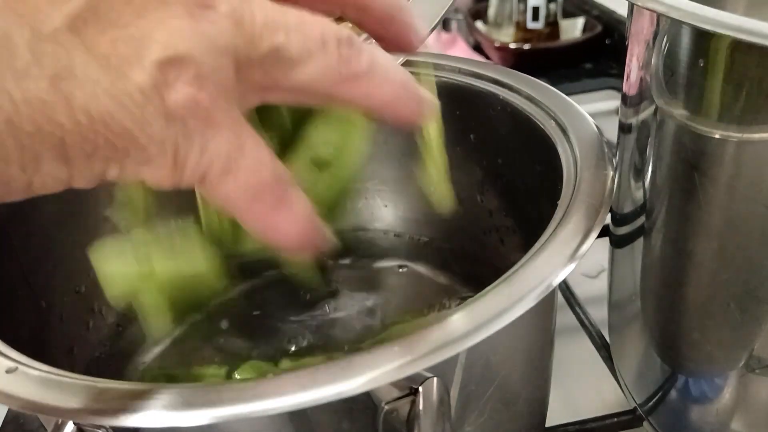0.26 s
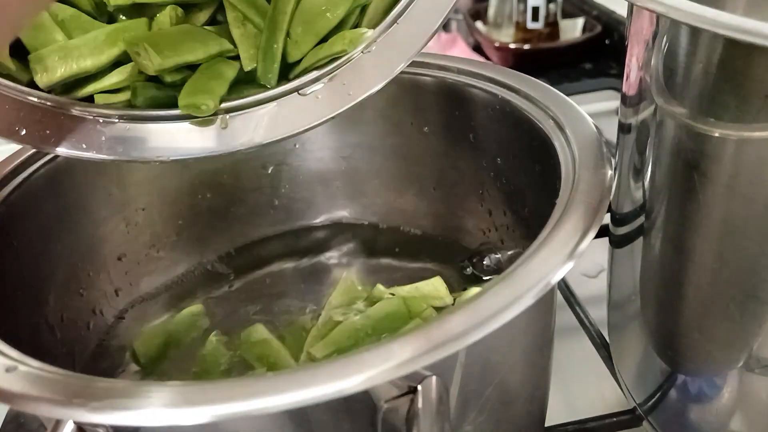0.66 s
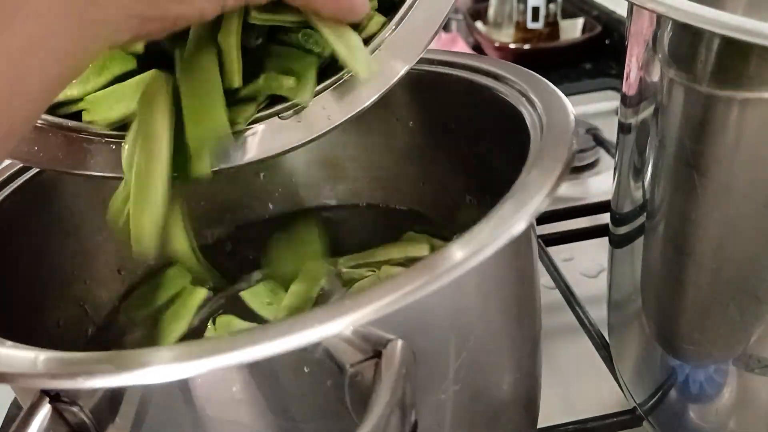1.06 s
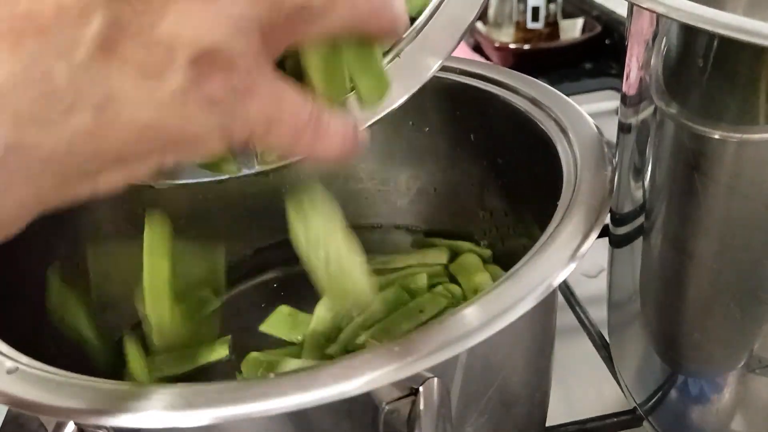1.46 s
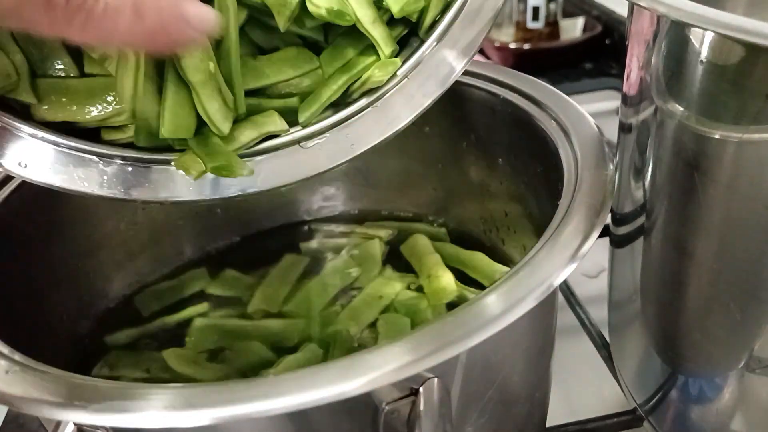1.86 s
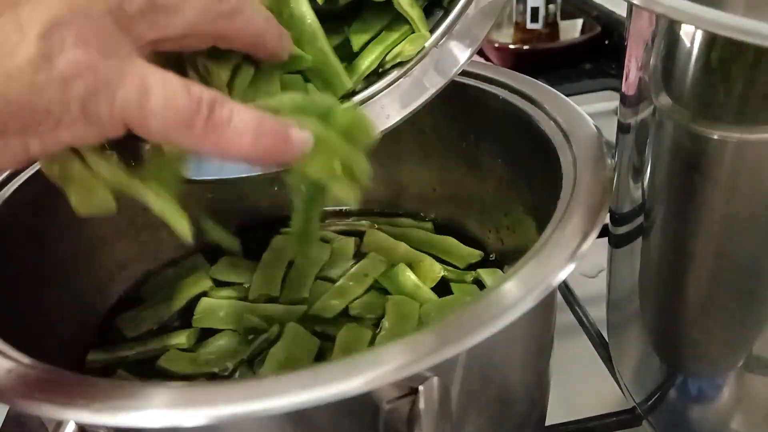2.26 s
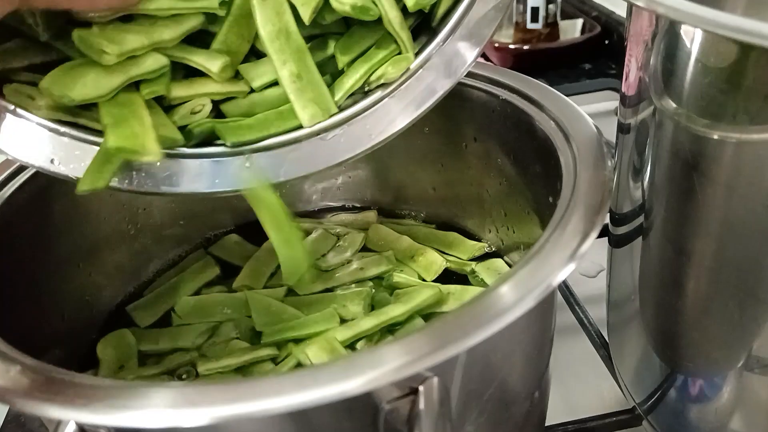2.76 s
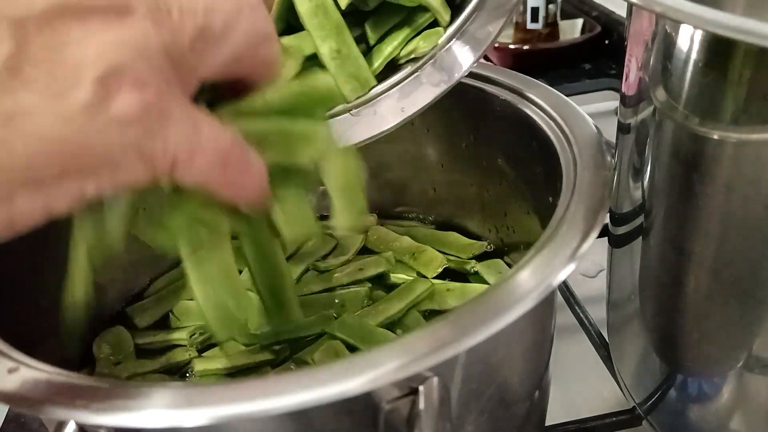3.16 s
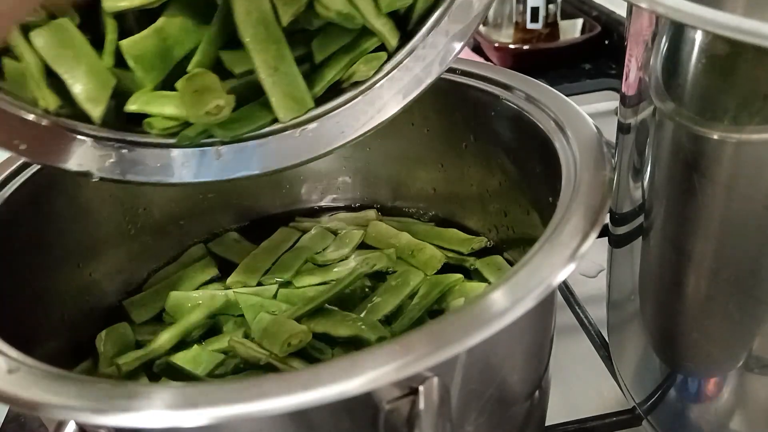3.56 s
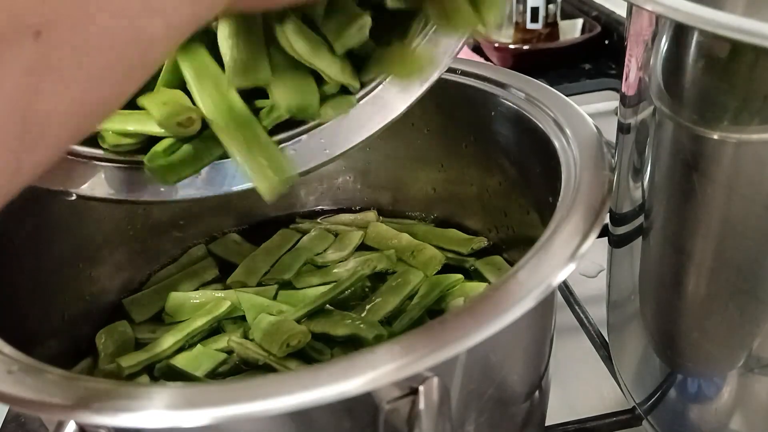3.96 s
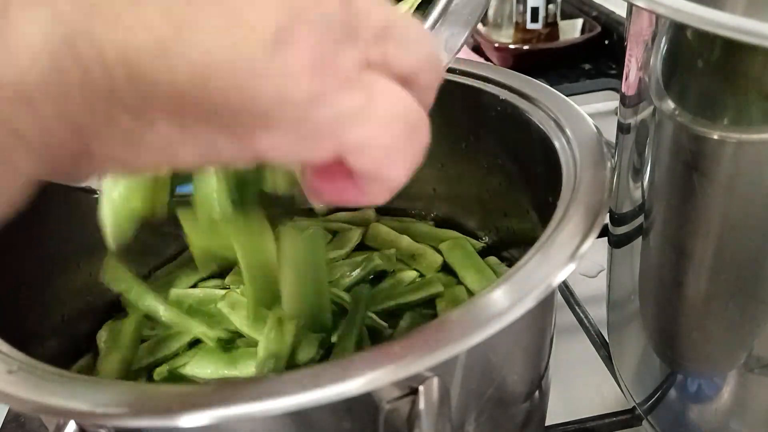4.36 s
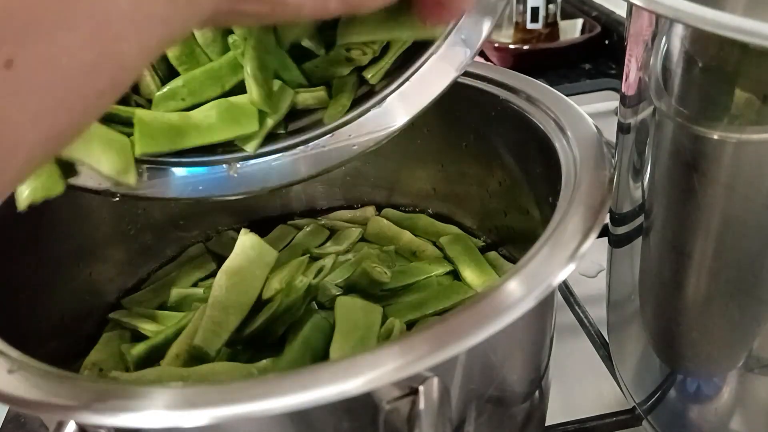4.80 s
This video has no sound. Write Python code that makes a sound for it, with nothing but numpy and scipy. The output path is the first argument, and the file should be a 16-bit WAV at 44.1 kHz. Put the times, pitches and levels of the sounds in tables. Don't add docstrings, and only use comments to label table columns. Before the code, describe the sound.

Close, wet pattering of beans raked from a metal bowl into a resonant pot, splashy first, then duller on the heap, over soft stove rumble.

```python
import sys
import numpy as np
from scipy import signal
from scipy.fft import rfft, irfft, next_fast_len
from scipy.io import wavfile

SR = 44100
rng = np.random.default_rng(int(sys.argv[2]) if len(sys.argv) > 2 else 0)


def master(y):
    cut = np.clip(np.atleast_2d(y).T, -1, 1)
    pcm = np.round(cut * 32767)
    wavfile.write(sys.argv[1], SR, pcm.astype(np.int16))


def boost(x):
    u = np.asarray(x, float) / 20
    return 10 ** u


N = 221990
SECONDS = np.arange(N) / SR

# (frequency [Hz], level [dB], t60 [s], left over right [dB])
HOLLOW = [(399.3, -7.5, 0.029, -7.5), (475.6, -3, 0.045, -8.5), (526.3, -3, 0.05, 15.5)]
# (frequency [Hz], level [dB], t60 [s], left over right [dB])
UPPER_HOLLOW = [(596.5, 4, 0.12, 0.74), (610, 0, 0.056, 0.8), (691, -9, 0.17, 0.35)]
# (frequency [Hz], level [dB], t60 [s], left over right [dB])
CROSS = [(807.3, 2, 0.048, -0.33), (969, 0.5, 0.066, 0.043), (1160, 1.5, 0.012, -0.68),
         (1179, 2.5, 0.053, -0.55), (1247, 1, 0.062, -0.19)]
# (frequency [Hz], level [dB], t60 [s], left over right [dB])
SLAP = [(1591, -6.5, 0.069, -10.5), (1925, -2, 0.013, 9), (1966, -4.5, 0.023, 4), (2200, 5.5, 0.018, 1),
        (2424, 2.5, 0.036, -1), (2640, -19.5, 0.026, 5), (2710, -4.5, 0.021, -2.5),
        (2940, -3.5, 0.028, -2.5), (3043, -5.5, 0.028, 0), (3370, -24, 0.0284, 4)]
# (frequency [Hz], level [dB], t60 [s], left over right [dB])
WALL = [(133.8, -9.5, 0.069, 5.5), (161.3, -28, 0.32, -10), (193.3, -1, 0.087, -1), (237.2, 2.5, 0.2, 2),
        (299.7, -3.5, 0.24, 1), (362, -20, 0.15, -5.5)]
# (frequency [Hz], level [dB], t60 [s], left over right [dB])
STEEL = [(460, -13, 0.0948, 1.5), (534, 3, 0.15, 2), (610, -22.5, 0.099, 1.53), (975, -6, 0.33, -0.99),
         (1270, -10.5, 0.15, -1)]
# (frequency [Hz], level [dB], t60 [s], left over right [dB])
BOWL_MODES = [(1240, -12, .25, 0), (1505, -9, .09, 1), (1860, -24, .1, 1), (2051, 0, .2, 2),
              (3714, -20, .05, 2)]

# (time [s], hollow [dB], cross re hollow [dB], slap re hollow [dB])
IN_WATER = [(0.174, -33.5, 0.5, -3), (0.232, -30, -4, 3.5), (0.261, -35, -9, -12),
            (0.296, -26.5, -10.5, -7.5), (0.363, -25, -14, -8), (0.391, -29, -4, -5), (0.433, -37, -3, 1),
            (0.471, -24.5, -3, 3), (0.496, -28, -0.5, 4.5), (0.515, -29, -23, 2), (0.544, -24.5, -8, -1.5),
            (0.681, -26.5, -30.5, -25), (0.825, -60.5, -29, 22.5), (1.031, -43.5, -2, -25),
            (1.226, -29.5, -3, -6.5), (1.263, -44.5, 14.5, -4), (1.301, -32.5, -12.5, -1),
            (1.326, -38.5, 5.5, -2), (1.349, -18.5, -17, -5), (1.387, -3.5, -3, -8.5),
            (1.429, -12, -21, -14), (1.504, -28.5, -17, -0.5), (1.55, -51, -18, 8),
            (1.641, -28.5, -2.5, -14), (1.655, -34, -5, -1.5), (1.778, -23.5, -17, -28),
            (1.814, -23, -2.5, -4), (1.849, -25, 0, -6), (1.885, -23, -22, -8), (1.905, -36.5, 4.5, -8),
            (1.936, -25.5, -31, -33)]
# (time [s], hollow [dB], cross re hollow [dB], slap re hollow [dB])
ON_HEAP = [(2.03, -20.5, -12.5, -26.5), (2.047, -39, -19, -45), (2.092, -15, -16.5, -36.5),
           (2.25, -28.5, -4.5, -6.5), (2.283, -20.5, -36, -25), (2.391, -43.5, 3, 7),
           (2.479, -26, -8.5, -7), (2.499, -28, 0.5, -25), (2.574, -23, -9.5, -13), (2.6, -17, -11.5, -15),
           (2.637, -17.5, -7.5, -9.5), (2.675, -24, -10, -10), (2.77, -25, -16.5, -16.5),
           (2.933, -40, -2.5, -5.5), (3.022, -30.5, -12, -12), (3.119, -7, -19, -19.5),
           (3.233, -13.5, -23, -49), (3.354, -23.5, -22, -16.5), (3.43, -32, -1, -5.5),
           (3.484, -38.5, 2, 3.5), (3.515, -39, -26, -14), (3.556, -35, -2.5, -7),
           (4.268, -23.5, -11, -4.5), (4.306, -19.5, -23, -10), (4.338, -18, -13, -14.5),
           (4.456, -27, -6.5, -14), (4.564, -27.5, -2, -19), (4.599, -25, -7, -3), (4.658, -27, -4, -6.5),
           (5.022, -22.5, -9, -10.5)]
# (time [s], hollow [dB], cross re hollow [dB], slap re hollow [dB])
STRAYS = [(0.03, -31, -22.5, -14), (2.338, -32, -29, -13.5), (2.52, -38, -17, -20),
          (2.709, -30.5, -27.5, -18), (3.395, -37, -19, -29), (0.161, -36, -28.5, -24.5),
          (0.585, -41, -4.5, -16), (1.152, -36.5, -25, -25.5), (4.418, -43.5, -3, 4), (4.515, -57, -8, 10),
          (4.70, -38.5, -25.5, -15)]
# (first bean [s], length [s], level [dB], brightness [dB])
HANDFULS = [(0.208, 0.06, -51, -5), (0.397, 0.15, -47, 3.5), (0.449, 0.1, -55, 8.5),
            (1.116, 0.35, -54, -25), (1.348, 0.16, -40.5, 6), (1.59, 0.29, -49, -8),
            (2.03, 0.17, -49.5, -13), (2.365, 0.39, -49.5, 0), (3.087, 0.033, -54.5, 0),
            (3.38, 0.16, -42.5, -5.5), (4.283, 0.11, -50.5, 2.5), (4.556, 0.14, -42, -1.5),
            (4.969, 0.32, -57.5, 0)]
# (time [s], level [dB], t60 [s])
WALL_HITS = [
    (1.39, -42, 0.26),
    (2.55, -60, 1.9),
    (3.121, -43, 0.7),
    (3.499, -52, 2.3),
    (4.105, -46.5, 0.086),
    (4.329, -44.5, 0.53),
    (4.55, -72, 1),
]

# (peak time [s], level [dB], frequency [Hz])
LOW_KNOCKS = [(0.373, -27.5, 520), (0.391, -27, 497), (0.506, -28.5, 555), (0.517, -30, 514),
              (0.548, -30, 537), (0.685, -35, 501), (1.354, -42, 640), (1.394, -7.5, 544),
              (1.404, -5.5, 553.3), (1.416, -17, 567), (1.438, -32, 525), (1.456, -38, 517),
              (1.482, -26.5, 597), (1.653, -29, 520), (1.821, -23.5, 542), (1.855, -29, 602),
              (1.887, -28, 578), (2.051, -27, 613), (2.076, -28, 612), (2.096, -20, 594), (2.111, -28, 615),
              (2.286, -29.5, 535), (2.303, -37.5, 516), (2.483, -29.5, 536), (2.523, -28.5, 601),
              (2.605, -26.5, 595), (2.713, -28, 583), (2.732, -32, 568), (2.776, -28.5, 579),
              (3.132, -20, 547), (3.169, -30, 643), (3.235, -28, 528), (3.244, -27, 581), (3.398, -29, 600),
              (3.519, -28, 538), (4.275, -26, 570), (4.289, -31, 613), (4.307, -39, 536), (4.342, -33, 566),
              (4.664, -26, 534), (4.71, -28, 670), (5.029, -35.5, 509)]
# (peak time [s], level [dB], frequency [Hz])
MID_KNOCKS = [(0.183, -45, 1140), (0.436, -33, 1120), (0.475, -29, 1150), (0.506, -27.5, 1158),
              (0.53, -31, 806), (0.546, -33.5, 1190), (0.546, -32.5, 814), (1.264, -28, 1164),
              (1.329, -27, 1157), (1.34, -25.5, 1166), (1.392, -17, 970), (1.42, -29, 1244),
              (1.445, -43, 1210), (1.466, -39, 990), (1.658, -27, 1183), (1.818, -23.5, 1193),
              (1.858, -24, 1154), (1.911, -34, 1220), (1.939, -35, 1157), (2.053, -34, 983),
              (2.099, -42, 1200), (2.253, -35, 1258), (2.487, -33, 776), (2.501, -23, 1190),
              (2.515, -36, 1215), (2.646, -41, 1130), (2.657, -30, 1232), (2.678, -25.5, 1200),
              (2.934, -41.5, 1195), (3.12, -31, 1070), (3.156, -41, 1200), (3.235, -38.5, 1230),
              (3.487, -27.5, 1184), (3.517, -33, 804), (4.271, -35.5, 826), (4.34, -31, 960),
              (4.349, -33, 1060), (4.46, -37, 1203), (4.567, -27, 1272), (4.585, -23, 1232),
              (4.6, -25.5, 1222), (4.657, -35, 1174), (4.691, -35.5, 1076), (5.029, -27.5, 1023)]
# (peak time [s], level [dB], frequency [Hz])
HIGH_KNOCKS = [(0.208, -37.5, 2940), (0.262, -40.5, 2690), (0.498, -42, 2820), (0.5, -45, 2200),
               (0.516, -44, 2850), (0.547, -37, 2120), (0.548, -36, 2950), (1.253, -38, 2250),
               (1.355, -26.5, 1720), (1.362, -17.5, 3220), (1.375, -22, 3430), (1.39, -22, 2980),
               (1.394, -25, 2370), (1.403, -22.5, 2890), (1.419, -43, 2350), (1.432, -26, 2960),
               (1.513, -35, 2940), (1.553, -32.5, 1830), (1.656, -36, 1690), (1.656, -44, 2260),
               (1.818, -37, 1790), (1.819, -37, 2450), (1.833, -44, 2220), (1.843, -37, 2100),
               (1.88, -40, 1770), (1.903, -35, 2350), (2.09, -40, 2410), (2.398, -32.5, 2080),
               (2.409, -36, 1533), (2.52, -34.5, 2200), (2.674, -40, 2300), (2.674, -40, 1910),
               (2.775, -44, 2300), (3.122, -40, 2965), (3.489, -33, 1903), (4.27, -29.5, 1850),
               (4.307, -37, 2510), (4.334, -33.5, 2380), (4.349, -34.5, 2260), (4.359, -39, 2360),
               (4.524, -37.5, 2320), (4.604, -47, 2960), (4.606, -35, 2230), (4.638, -37, 2300)]
# (peak time [s], level [dB],
# frequency [Hz])
FURTHER_KNOCKS = [(.31, -38, 2870), (.365, -30.5, 523), (.39, -39.5, 1830), (.412, -38, 506),
                  (.42, -36, 1816), (.452, -33.5, 2000), (.457, -34, 546), (.484, -33, 2880), (.57, -37, 703),
                  (2.615, -37, 2320), (2.625, -25, 615), (2.695, -27, 610), (2.705, -38.5, 2244),
                  (3.348, -40.5, 1180), (3.365, -38, 613), (3.38, -30, 614), (3.395, -42, 1180),
                  (3.412, -30.5, 627), (3.433, -37, 645), (3.455, -31, 627), (3.547, -46, 2130),
                  (3.915, -38, 2120), (4.412, -39.5, 1128), (4.425, -37.5, 2950), (4.43, -36, 2280),
                  (4.432, -44, 1240), (4.552, -35.5, 505)]

# (time [s], peak [dB], centre frequency [Hz], t60 [s])
SPLASHES = [(0.211, -9.5, 7650, 0.021), (0.3485, -14.5, 7840, 0.039), (0.432, -15.5, 7240, 0.06),
            (0.4533, -4.5, 8370, 0.098), (0.502, -9, 6700, 0.044), (0.543, -13.5, 7400, 0.019),
            (0.5814, -17, 7100, 0.049), (0.832, -14.5, 6960, 0.11), (0.95, -19.5, 7280, 0.16),
            (0.973, -26, 7400, 0.059), (1.3032, -7.5, 7750, 0.018), (1.327, -14.5, 7700, 0.083),
            (1.3499, 4, 6070, 0.057), (1.387, -2, 5750, 0.095), (1.6387, -28, 8060, 0.071),
            (1.6966, -20, 6960, 0.034), (1.8322, -10.5, 7100, 0.14), (1.9048, -7, 7000, 0.028),
            (2.239, -19.5, 6740, 0.078), (2.3665, -24, 7430, 0.11), (2.601, -15, 7750, 0.045),
            (2.669, -16.5, 7200, 0.048), (2.769, -22, 7480, 0.058), (3.1167, -11.5, 7320, 0.042),
            (3.899, -21.5, 7450, 0.048), (4.199, -20, 6900, 0.023), (4.2669, -8.5, 8400, 0.021),
            (4.623, -24.5, 7540, 0.98), (4.974, -15.5, 7060, 0.043)]
# (time [s], peak [dB], centre frequency [Hz], t60 [s])
FLECKS = [
    (0.198, -24, 4980, 0.096),
    (0.297, -26, 5070, 0.048),
    (3.329, -32.5, 5360, 0.054),
    (4.138, -20.5, 5200, 0.066),
    (4.19, -33, 4930, 0.062),
    (1.504, -18, 4530, 0.028),
    (4.632, -26, 3700, 0.03),
]

# (time [s], level [dB])
RAKING = [(0.0, -56), (0.45, -60.5), (0.59, -54.5), (0.71, -69.5), (0.85, -52), (1.0, -53.5), (1.24, -62),
          (1.47, -51), (1.9, -68), (2.16, -54), (2.56, -55), (2.9, -59), (3.21, -51), (3.38, -60.5),
          (3.76, -66), (3.92, -55.5), (4.21, -47.5), (4.5, -59.5)]
# (frequency [Hz], density [dB per Hz])
WET = [(1760, -47), (3000, -18.5), (3740, -15), (4530, -13.5), (4980, -9), (5520, -4.5), (6650, 2),
       (7840, 2.5), (8630, -14.5), (10100, -14), (12100, -37.5), (15400, -27)]
# (time [s], peak [dB], low modes re peak [dB])
BOWL_TAPS = [
    (2.17, -47, 0.1),
    (2.3919, -38.5, 10),
    (3.8805, -37.5, -7.5),
]
# (peak time [s], level [dB], frequency [Hz])
BOWL_NUDGES = [
    (4.035, -54, 1226),
    (4.097, -50, 1247),
    (4.182, -43, 1196),
]

# (frequency [Hz], density [dB per Hz])
STOVE = [(15, -85), (25, -55.5), (64, -36), (86, -13), (183, -4), (239, -7.5), (339, -12.5), (536, -24.5),
         (802, -26.5), (1900, -57), (2230, -34), (2620, -83), (7280, -88), (8100, -18), (15400, -46)]
# (frequency [Hz], left over right [dB])
STOVE_LEAN = [(60, 2.5), (110, -4.5), (200, 6.5), (380, -10.5), (700, 3), (1290, -28), (2380, 6.5),
              (4400, 21.5), (8120, 17), (15000, 5)]
# (frequency [Hz], correlation [0 to 1])
LIKENESS = [(30, .3), (70, 0.68), (160, 0.94), (300, 0.36), (1000, 0.39), (3000, 0.12), (15000, 0)]
# (frequency [Hz], width [Hz], level [dB], left over right [dB])
JETS = [(99.9, 18.3, -54, 1.5), (122.3, 18, -57, 3.5), (161.2, 14, -65.5, 5), (2225, 190, -63, 11.5),
        (6740, 160, -67.5, -12), (8060, 310, -55.5, 21.5)]


def pot():
    landings = list(IN_WATER) + list(ON_HEAP) + list(STRAYS)
    s, hollow_db, cross_db, slap_db = np.transpose(landings)
    filled_s = 1.5
    upper_db = np.interp(s, [0, filled_s], [-24, -10]) - 0.032 * (hollow_db + 15.0)
    low, cross = tumbling()
    slap = cross * boost(-16) + raking() * boost(-1)
    upper = low * boost(np.interp(SECONDS, [0, filled_s], [-11, -8.5]))
    hum = low * boost(-10.5) + sum(decays([at], level_db, t60) for at, level_db, t60 in WALL_HITS)
    return (struck(HOLLOW, s, hollow_db - 12.0, 0.012, low * boost(-2.0), 0.028)
            + struck(UPPER_HOLLOW, s, hollow_db + upper_db - 9.0, 0.013, upper, 0.038)
            + struck(CROSS, s, hollow_db + cross_db - 11.5, 0.014, cross * boost(-14.0), 0.25, spread_db=7.0)
            + struck(SLAP, s, hollow_db + slap_db - 18.0, 0.03, slap * boost(-12.5), 0.1, spread_db=9.5)
            + struck(WALL, s, hollow_db - 27.0, 0.02, hum * boost(4.0), 0.44)
            + slosh(s, hollow_db + slap_db + 8.0, slap * boost(-4.0))
            + drips(cross * boost(1.5) + low * boost(-11)))


def tumbling():
    rise_db_per_s, fall_db_per_s = 183.5, 223
    low = bright = boost(-72.5)
    for s, length, level_db, bright_db in HANDFULS:
        rise_db = rise_db_per_s * np.maximum(s - SECONDS, 0)
        fall_db = fall_db_per_s * np.maximum(SECONDS - s - length, 0)
        shape = boost(level_db - rise_db - fall_db)
        low = low + shape
        bright = bright + shape * boost(bright_db)
    return low, bright


def slosh(times, levels_db, rain):
    tearing = signal.lfilter([0.004], [1, -0.996], decays(times, levels_db, 0.054))
    torn = grains(2300, spread_db=1.5) * (tearing + rain)
    band = signal.butter(2, [1750, 3300], "band", fs=SR, output="sos")
    return placed(signal.sosfilt(band, torn), 0.9, 0.2)


def drips(level):
    out, age = np.zeros((2, N + 2000)), np.arange(2000) / SR
    for when, pitch, size, side in rng.random((380, 4)):
        at, hz = int(when * N), 500 * 2.7 ** pitch
        cycles = hz * age
        envelope = boost(-60 * cycles / 35) * (1 - np.exp(-cycles / 2.0))
        chirp = np.sin(2 * np.pi * cycles * (1 + 0.0089 * cycles)) * envelope
        strength = level[at] * boost(11.0 * size - 5.0)
        out[:, at:at + 2000] += placed(chirp * strength, 6 * side - 2, 0.51 * side)
    return out[:, :N]


def clang():
    return struck(STEEL, np.array([1.3875]), np.array([-16.5]), 0.01, 0, 0.1, spread_db=0)


def single_beans():
    return (knocks(LOW_KNOCKS, 0.00491, 1.8, 1.0, 2.3, 0.022)
            + knocks(MID_KNOCKS, 0.00404, 2.1, 2.0, -0.73, 0.16)
            + knocks(HIGH_KNOCKS, 0.003, 1.03, 4.7, 9.1, 0.3)
            + knocks(FURTHER_KNOCKS, 0.00401, 1.76, 1.33, 1.6, 0.1)
            + knocks(BOWL_NUDGES, 0.0072, 1.7, 0, 1.5, 0.14))


def knocks(rows, swell_s, fade, gain_db, lean_db, lag_ms):
    out, age = np.zeros(N + 3000), np.arange(3000) / SR
    swelling = np.sin(np.pi / 2 * age / swell_s) ** 2
    fading = np.exp(-(age - swell_s) / (fade * swell_s))
    shape = np.where(age < swell_s, swelling, fading)
    for s, level_db, hz in rows:
        at = int((s - swell_s) * SR)
        out[at:at + 3000] += boost(level_db + gain_db) * shape * np.sin(2 * np.pi * hz * age)
    return placed(out[:N], lean_db, lag_ms)


def spray():
    out, drops, age = np.zeros((2, N + 9000)), grains(9000, spread_db=-1.5), np.arange(9000) / SR
    for s, level_db, hz, t60 in list(SPLASHES) + list(FLECKS):
        at = int(s * SR)
        width = max(1.064 + 0.45 * boost(level_db), 1.05)
        swell = 1 - np.exp(-age / (0.00048 * boost(-0.45 * level_db)))
        burst = np.roll(drops, -at)[:9000] * boost(level_db - 10.5 - 60 * age / t60) * swell
        band = signal.butter(3, [hz / width, min(hz * width, 18000)], "band", fs=SR, output="sos")
        full = np.sqrt(SR / 2 / hz / (width - 1 / width))
        lag_ms = 0.0076 + 0.284 * rng.random()
        out[:, at:at + 9000] += placed(full * signal.sosfilt(band, burst), 4.8, lag_ms)
    fine = signal.lfilter(*signal.butter(2, 6000, "high", fs=SR), out)
    left_right = np.array([[1], [-1]])
    out = (out - fine) * boost(-2.5 * left_right) + fine * boost(1.5 * left_right)
    return signal.sosfilt(signal.butter(3, 9800, fs=SR, output="sos"), out[:, :N])


def mist():
    s, level_db = np.transpose(SPLASHES)[:2]
    burst = grains(12160, spread_db=7.0) * decays(s, 1.2 * level_db - 34.5, 0.1)
    band = signal.butter(2, [9500, 15500], "band", fs=SR, output="sos")
    return placed(signal.sosfilt(band, burst), 4.5, 1.0)


def rustle():
    shared = placed(grains(1700, spread_db=-0.5), 2.5, 0.13)
    own = 1.8 * np.array([grains(2800, spread_db=8.0), grains(3200, spread_db=0.5)])
    patches_db = 2.8 * drift(30)
    return raking() * boost(7.5 + patches_db) * coloured(shared + own, WET)


def raking():
    level_db = np.interp(SECONDS, *np.transpose(RAKING))
    again_s, again_db_per_s = 4.76, 39.5
    return boost(level_db + again_db_per_s * np.maximum(SECONDS - again_s, 0))


def bowl():
    s, level_db, low_db = np.transpose(BOWL_TAPS)
    deep = struck(BOWL_MODES[:2], s, level_db + low_db, 0.0182, 0, 0.1, spread_db=0.1)
    thin = struck(BOWL_MODES[2:], s, level_db + 1, 0.035, 0, 0.1, spread_db=0.1)
    return deep + thin


def kitchen(x):
    age = np.arange(SR // 2) / SR
    t60_s, first_echo_s = 0.2, 0.004
    tail = rng.standard_normal((2, SR // 2)) * boost(-60 * age / t60_s) * (age > first_echo_s)
    tail = signal.lfilter(*signal.butter(1, [350, 6000], "band", fs=SR), tail)
    return signal.fftconvolve(x, tail / np.sqrt(np.sum(tail ** 2) / 2), axes=1)[:, :N]


def stove():
    size = next_fast_len(N)
    hz = np.fft.rfftfreq(size, 1 / SR)
    mid, side = rfft(rng.standard_normal((2, size)))
    alike = np.clip(at_hz(LIKENESS, hz), 0, 1)
    lean_db = at_hz(STOVE_LEAN, hz) / 2 * [[1], [-1]]
    pair = np.sqrt(1 + alike) * mid + np.sqrt(1 - alike) * side * [[1], [-1]]
    broad = irfft(pair * boost(at_hz(STOVE, hz) + lean_db), size)[:, :N]
    out = boost(-52.5 + 2.8 * drift(8.9)) * rms_one(broad)
    for hz, width_hz, level_db, lean_db in JETS:
        once = ring(rng.standard_normal(N), hz, 1.9 / width_hz)
        band = ring(once, hz, 3.0 / width_hz)
        flicker_db = 2.3 * drift(25) + (3.5 if hz < 1000 else 1.2) * drift(4.7)
        out += boost(level_db + flicker_db) * placed(rms_one(band), lean_db, 0.16)
    return out


def struck(modes, times, levels_db, contact_s, rain, lag_ms, spread_db=5.0):
    out = 0
    rain = rain + signal.lfilter([0.003], [1, -0.997], decays(times, levels_db - 4.0, 0.064))
    for hz, level_db, t60, lean_db in modes:
        chance = rng.standard_normal((len(times), 2))
        at = times + np.abs(chance[:, 0]) * contact_s / 9
        firm_db = 0.095 * (levels_db - np.max(levels_db)) + 0.29
        blow = decays(at, levels_db + firm_db + spread_db * chance[:, 1], 1 / SR)
        rough = rng.standard_normal(N) / np.sqrt(contact_s * SR / 14)
        crumble = 0.88 * decays(at, levels_db, contact_s) * rough
        patter = rain * np.roll(PATTER, rng.integers(0, 300)) / np.sqrt(t60 * SR / 28)
        near_mode = signal.butter(2, [hz / 1.3, hz * 1.3], "band", fs=SR)
        soft = signal.lfilter(*near_mode, blow + crumble + patter)
        out = out + boost(level_db) * placed(ring(soft, hz, t60), lean_db, lag_ms * rng.uniform(0.049, 1.2))
    return out


def ring(clicks, hz, t60):
    r, w = boost(-60 / (t60 * SR)), 2 * np.pi * hz / SR
    return signal.lfilter([0, np.sin(w)], [1, -2 * r * np.cos(w), r * r], clicks + 1e-18)


def decays(times, levels_db, t60):
    steps = np.zeros(N)
    steps[np.minimum((np.asarray(times) * SR).astype(int), N - 1)] = boost(levels_db)
    return signal.lfilter([1], [1, -boost(-60 / (t60 * SR))], steps + 1e-18)


def grains(per_s, spread_db):
    sizes = boost(spread_db * np.minimum(rng.exponential(1, N), 4)) * rng.choice([-1, 1], N)
    return rms_one(sizes * (rng.random(N) < per_s / SR))


def placed(x, lean_db, lag_ms):
    late = np.interp(np.arange(len(x)) - lag_ms * SR / 1000, np.arange(len(x)), x)
    return np.array([x * boost(lean_db / 2), late * boost(-lean_db / 2)])


def drift(rate):
    return np.interp(SECONDS * rate, np.arange(400), rng.standard_normal(400))


def coloured(x, spectrum):
    size = next_fast_len(N + 4096)
    gain = boost(at_hz(spectrum, np.fft.rfftfreq(size, 1 / SR)))
    return rms_one(irfft(rfft(x, size) * gain, size)[..., :N])


def at_hz(points, hz):
    point_hz, value = np.transpose(points)
    return np.interp(np.log(np.maximum(hz, 1)), np.log(point_hz + 1), value)


def rms_one(x):
    return x / np.sqrt(np.mean(x ** 2) + 1e-20)


PATTER = grains(per_s=1300, spread_db=4.0)


def scene():
    near = pot() + clang() + bowl() + spray() + mist() + single_beans() + rustle()
    return near + boost(-10) * kitchen(near) + stove()


def roll_off(x):
    return signal.sosfilt(signal.butter(12, 15600, fs=SR, output="sos"), x)


def record(dry):
    low_cut = signal.butter(3, 72, "high", fs=SR, output="sos")
    mix = np.clip(signal.sosfilt(low_cut, dry), -1, 1)
    return roll_off(mix)


dry = scene()
out = record(dry)
master(out)
```